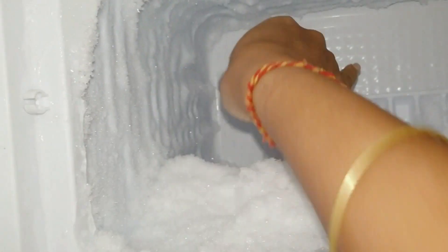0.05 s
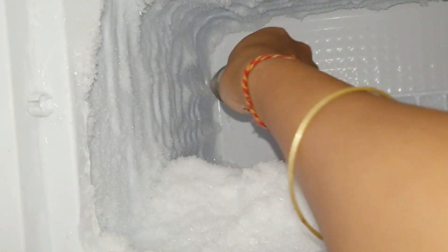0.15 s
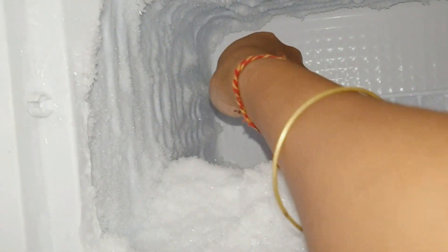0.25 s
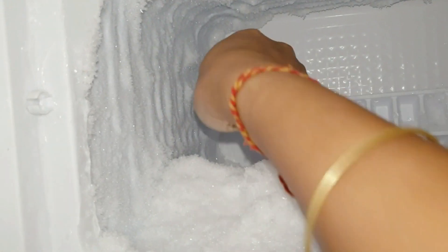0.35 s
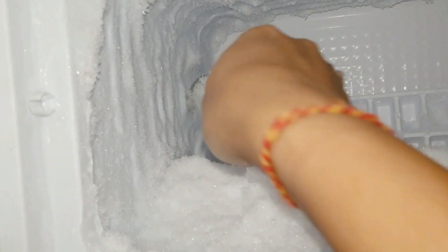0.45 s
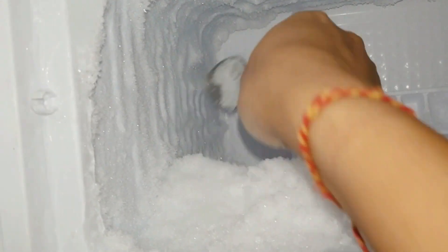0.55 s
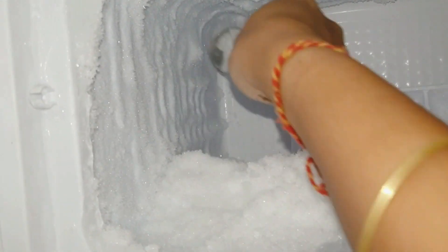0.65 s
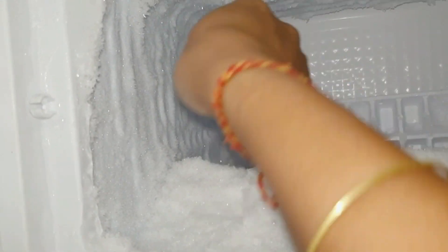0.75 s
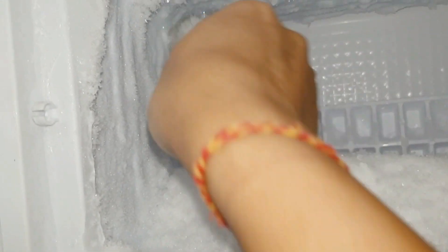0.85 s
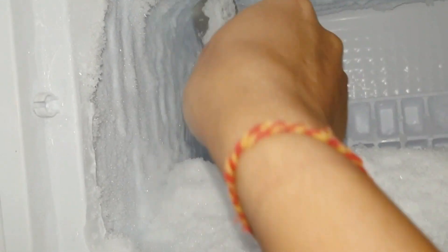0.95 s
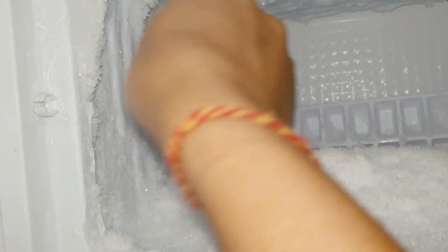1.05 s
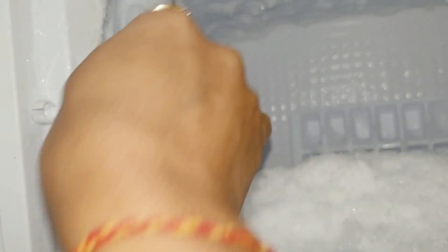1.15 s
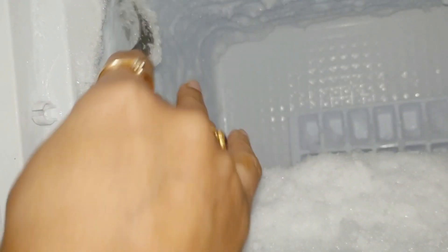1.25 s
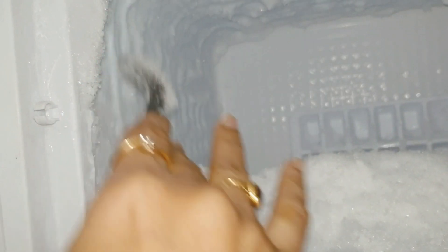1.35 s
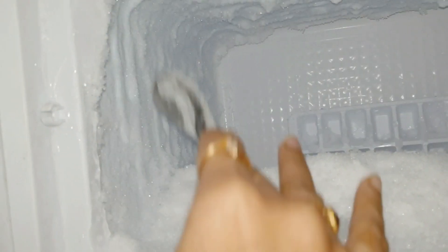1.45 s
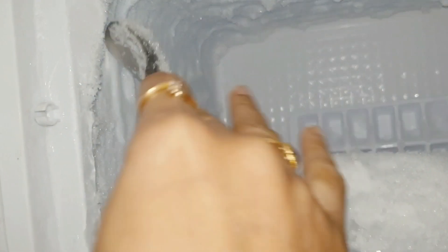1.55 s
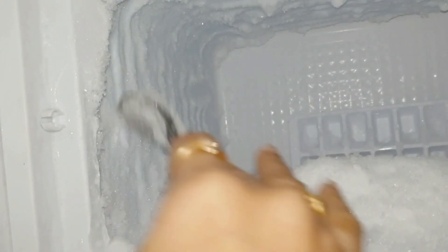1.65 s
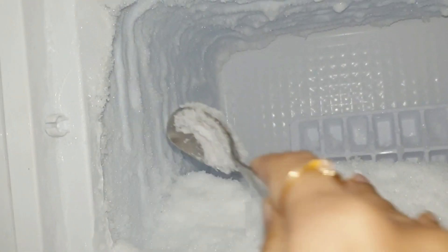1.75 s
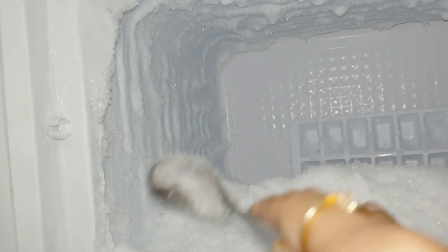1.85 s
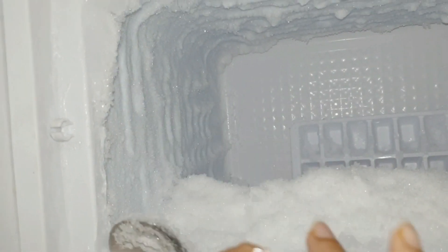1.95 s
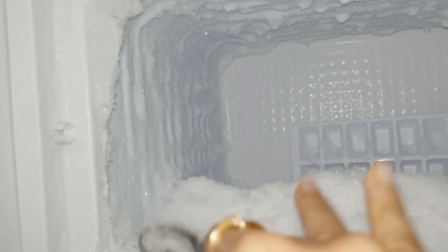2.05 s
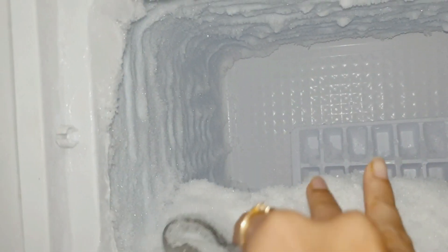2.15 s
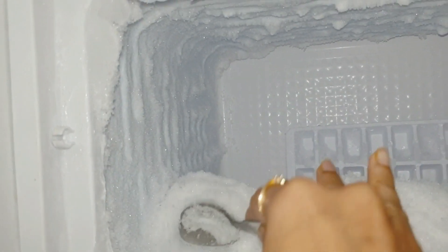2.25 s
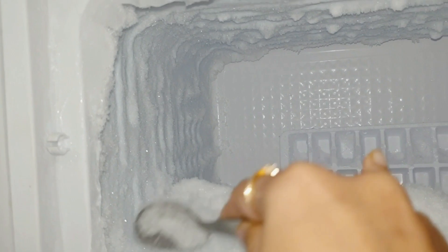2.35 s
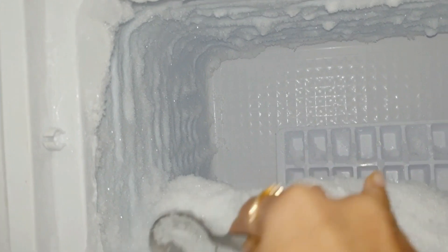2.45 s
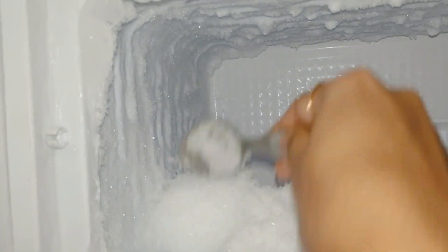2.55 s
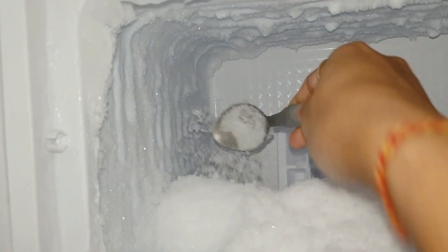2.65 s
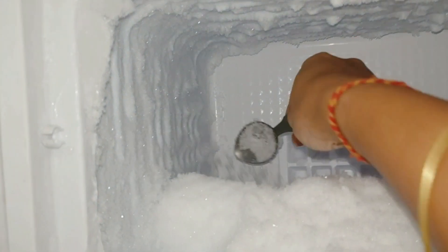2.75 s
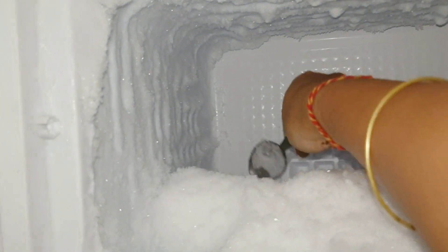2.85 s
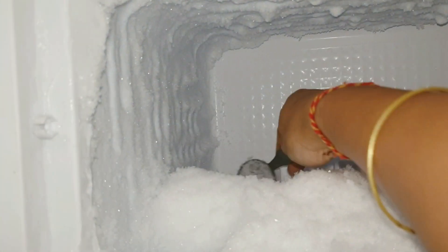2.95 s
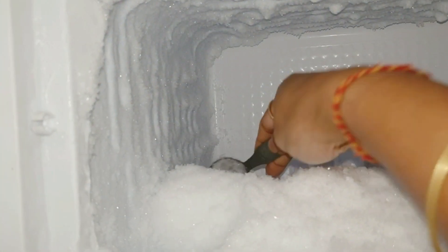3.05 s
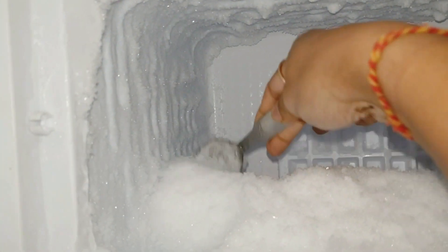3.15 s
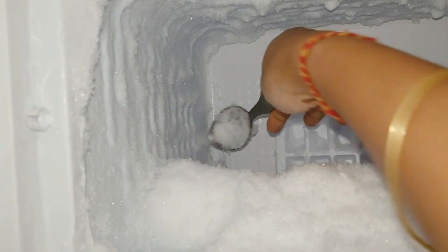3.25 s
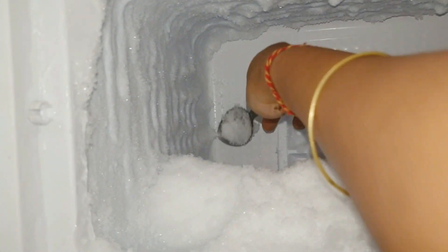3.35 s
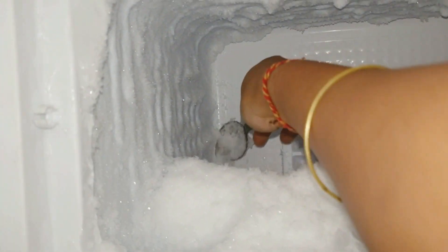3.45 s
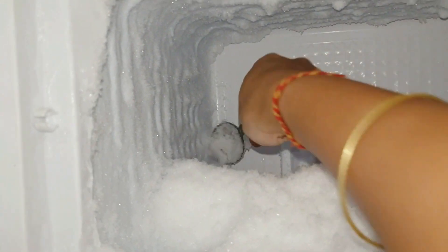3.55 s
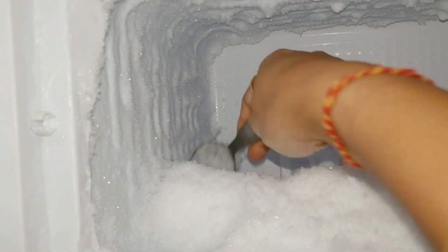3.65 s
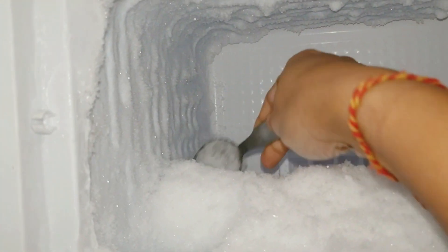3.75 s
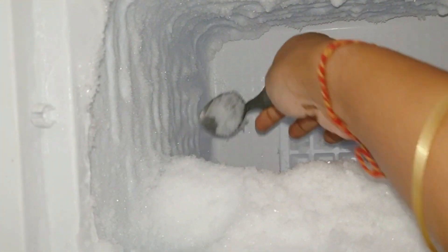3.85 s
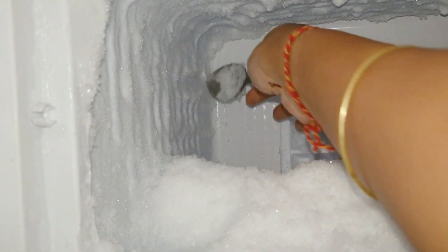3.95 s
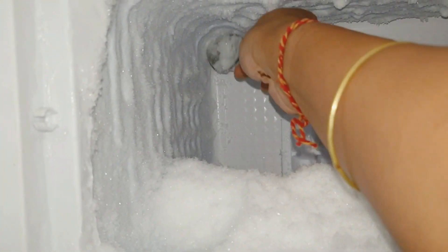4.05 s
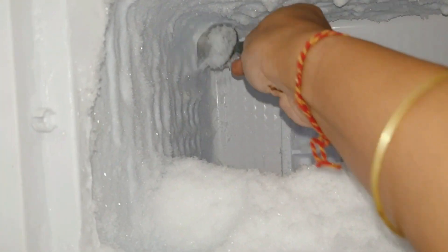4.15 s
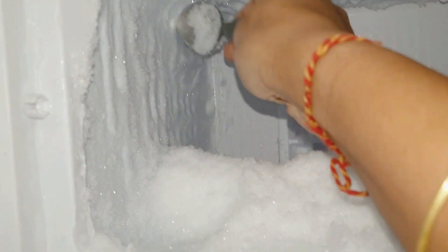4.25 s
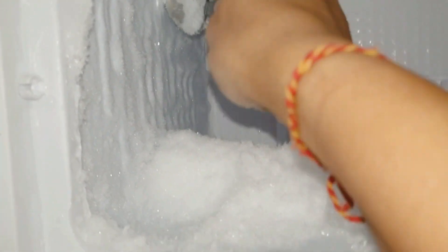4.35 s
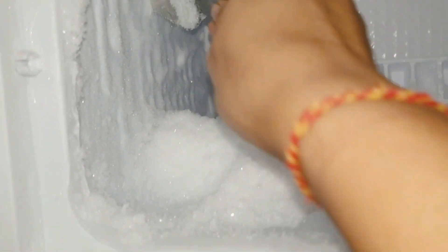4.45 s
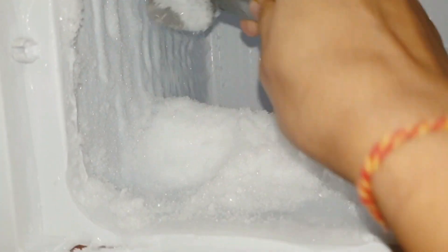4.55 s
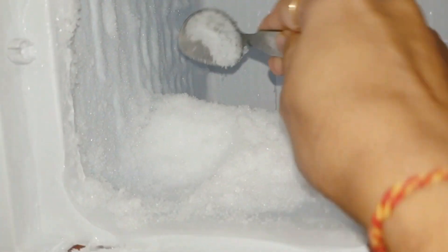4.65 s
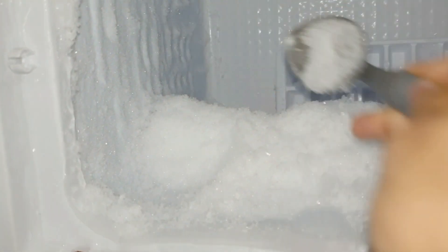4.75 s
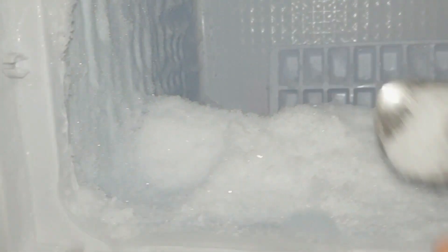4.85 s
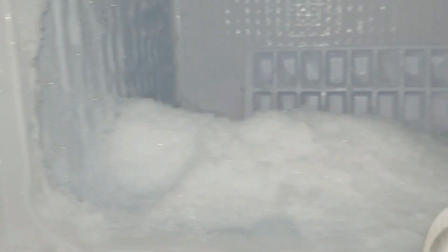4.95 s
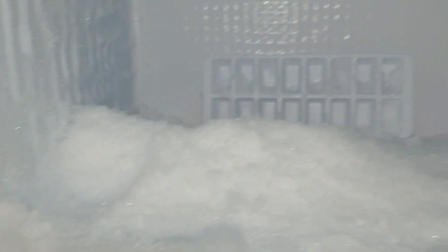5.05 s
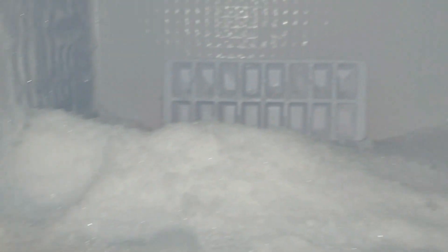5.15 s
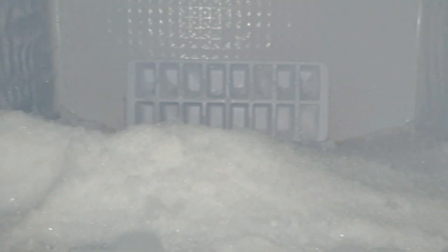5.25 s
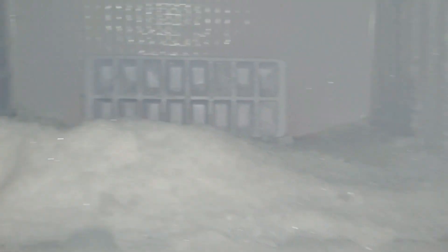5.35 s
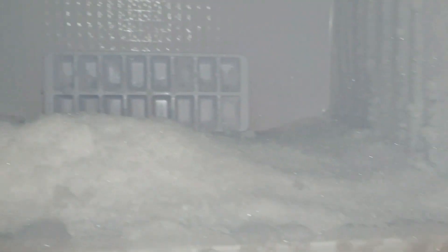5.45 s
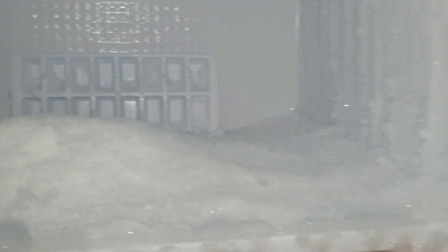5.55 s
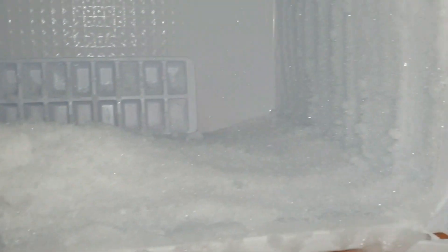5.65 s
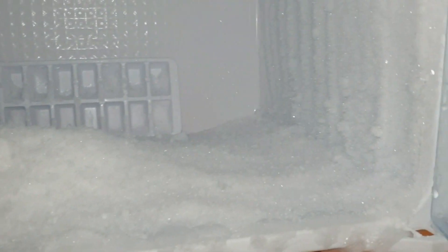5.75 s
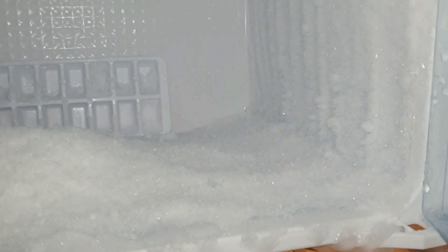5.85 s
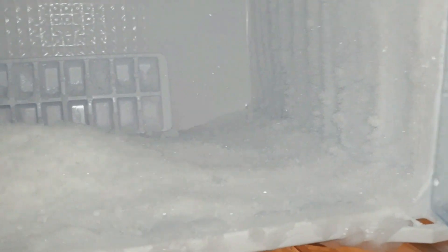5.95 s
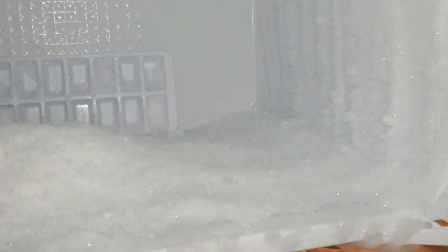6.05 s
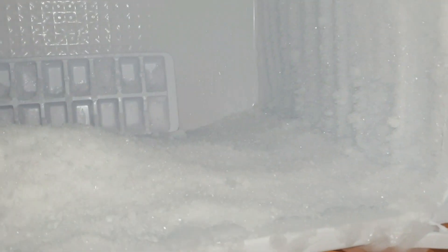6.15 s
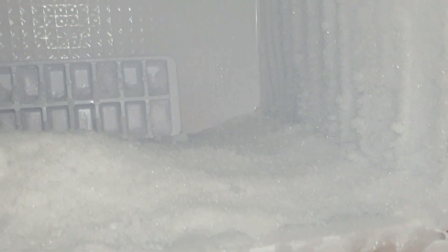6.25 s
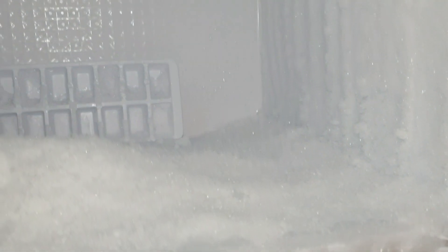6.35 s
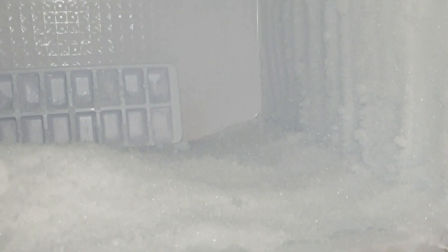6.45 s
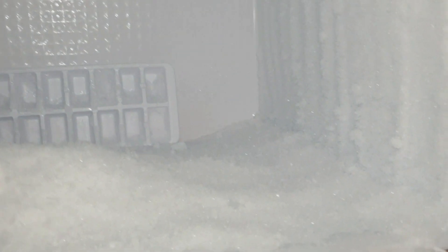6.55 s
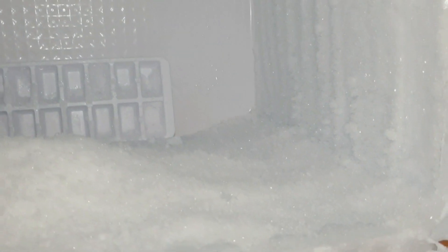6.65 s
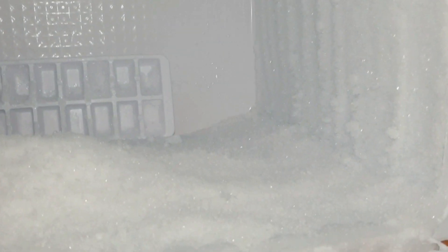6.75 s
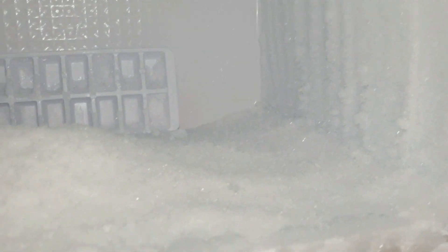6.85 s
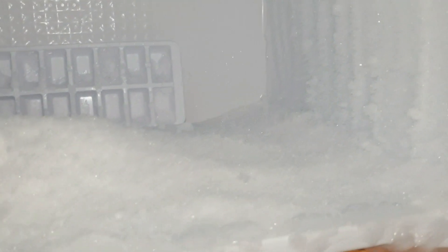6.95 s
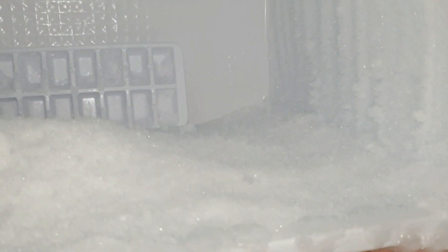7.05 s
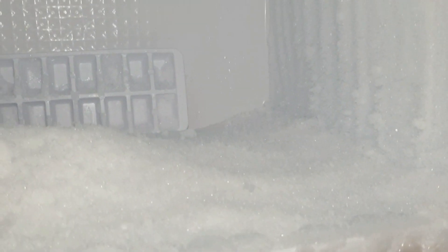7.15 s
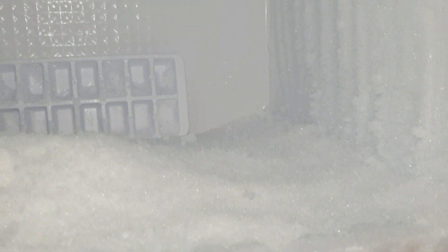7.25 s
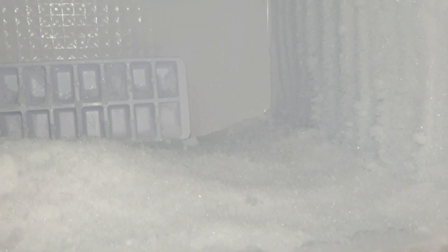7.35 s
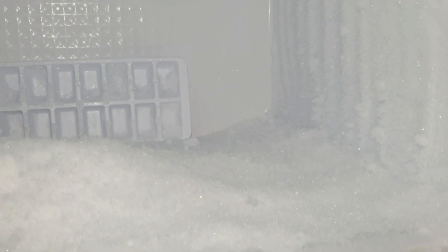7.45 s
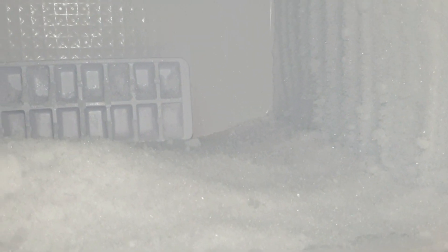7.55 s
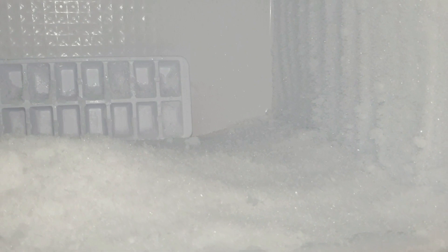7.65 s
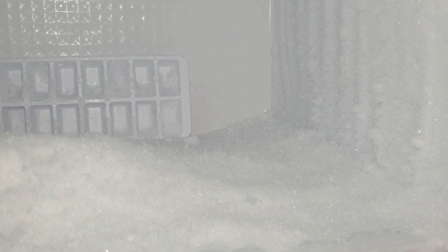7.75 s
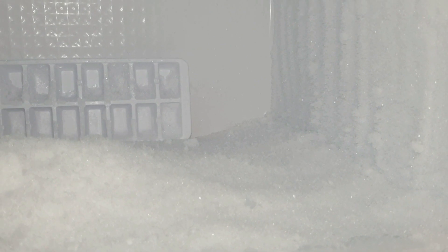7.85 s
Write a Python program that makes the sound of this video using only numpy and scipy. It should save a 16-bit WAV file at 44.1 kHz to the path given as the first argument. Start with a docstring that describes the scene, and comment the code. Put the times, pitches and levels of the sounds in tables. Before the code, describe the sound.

A steel spoon scrapes frost from the walls of a small freezer in about ten quick, crunchy strokes, mixed with knocks on hard ice that make the walls boom slightly. Midway, two loud, dull bumps hit the right side of the close microphone. The scraping stops, and after a lull come a short crackling judder, a few ice ticks and light rubs. A low hum, rumble and hiss lie underneath.

```python
"""A steel spoon scrapes frost off the walls of a small freezer box in ten quick strokes, with knocks and ticks.
Breaking crystals form a dense train of impulses, filtered by resonance: the air in the box colours each
stroke, the wall booms and the spoon's bowl sings near 12 kHz. Something bumps the right microphone twice.
After a lull come a judder, a few ticks and brief rubs. A low hum, rumble and hiss lie underneath."""
import sys
import numpy as np
from scipy import signal
from scipy.fft import rfft, irfft
from scipy.io import wavfile

SR = 44100
rng = np.random.default_rng(int(sys.argv[2]) if len(sys.argv) > 2 else 0)


def log_audio(samples):
    """Write samples as a 16-bit WAV file to the path given in sys.argv[1]."""
    # one column per channel
    frames = np.atleast_2d(samples).T
    # limit to full scale, then quantise
    limited = np.clip(frames, -1, 1)
    pcm = np.round(limited * 32767).astype(np.int16)
    wavfile.write(sys.argv[1], SR, pcm)


N = 348831


def from_db(db):
    """The decibel scale: 20 dB is a tenfold amplitude."""
    return 10 ** (np.asarray(db) / 20)


def unit_rms(x):
    """Normalisation to a mean power of 1."""
    return x / np.sqrt(np.mean(x ** 2) + 1e-20)


def butter(x, hz, kind, order=2):
    """Causal Butterworth filter, maximally flat in its passband."""
    sections = signal.butter(order, np.clip(hz, 10, .45 * SR), kind, fs=SR, output="sos")
    return signal.sosfilt(sections, x + 1e-18)


def drift(rate_hz, size):
    """Random modulation: Gaussian values, rate_hz a second, joined by straight lines."""
    knots = rng.standard_normal(4000)
    return np.interp(np.arange(size) / SR * rate_hz, np.arange(len(knots)), knots)


def colour(x, spectrum, modes=(), size=4096):
    """Minimum-phase filter: resonances (centre_hz, width_hz, boost_db) on a curve (freq_hz, gain_db)."""
    hz = np.maximum(np.arange(size // 2 + 1) * SR / size, 1)
    curve_hz, curve_db = np.transpose(spectrum)
    db = np.interp(np.log(hz), np.log(curve_hz), curve_db)
    for centre_hz, width_hz, boost_db in modes:
        db = db + boost_db / (1 + (2 * (hz - centre_hz) / width_hz) ** 2)
    cepstrum = irfft(np.log(from_db(db)))
    cepstrum[1:size // 2] *= 2  # folding the cepstrum makes the response causal
    cepstrum[size // 2 + 1:] = 0
    response = irfft(np.exp(rfft(cepstrum)))
    return signal.fftconvolve(x, response[None], axes=-1)[:, :x.shape[-1]]


def stereo(pair, coherence, pan_db):
    """Partial coherence: two signals cross-mix into left and right, whose mean has rms 1."""
    angle = np.arcsin(np.clip(coherence, -1, 1)) / 2
    mixed = np.cos(angle) * pair + np.sin(angle) * pair[::-1]
    panned = mixed * from_db([[pan_db / 2], [-pan_db / 2]])
    return panned / np.sqrt(np.mean(panned.mean(0) ** 2) + 1e-20)


def add(out, start_s, sound):
    """Superposition: a sound sums into the mix from start_s."""
    at = max(round(start_s * SR), 0)
    out[:, at:at + sound.shape[1]] += sound[:, :N - at]


# Swells of the hum: start_s, length_s, level_db
HUM_SWELLS = [(2.68, 0.59, -33.5), (6.25, 0.91, -41), (7.118, 0.87, -46)]

def hum(pitch_hz=53.4, waver_hz=0.84, steady_db=-57):
    """Frequency and amplitude modulation: a low tone wavers and now and then swells."""
    t = np.arange(N) / SR
    swells = sum(from_db(db) * np.sin(np.pi * np.clip((t - start_s) / length_s, 0, 1))
                 for start_s, length_s, db in HUM_SWELLS)
    tone = np.sin(2 * np.pi * np.cumsum(pitch_hz + waver_hz * drift(17, N)) / SR)
    return (from_db(steady_db) + swells) * stereo(np.array([tone, tone]), coherence=0.97, pan_db=-4.5)


# Spectrum of the rumble: freq_hz, relative_db
RUMBLE_SPECTRUM = [(15, -35.5), (25, -6.5), (43, -6.5), (59, 2.5), (79, -10), (119, 0), (178, -14.5),
                   (234, -11), (406, -15), (564, -24.5), (619, -17.5), (678, -28), (800, -26.5),
                   (1090, -43.5), (2000, -56.5), (2600, -73), (4400, -120)]

def rumble():
    """Coloured noise, strongest in the bass and nearly coherent between left and right."""
    noise = colour(rng.standard_normal((2, N)), RUMBLE_SPECTRUM, modes=[(53, 19, -8.5), (107, 52, 5)])
    return stereo(noise, coherence=0.93, pan_db=-4.5)


# Spectrum of the hiss: freq_hz, relative_db
HISS_SPECTRUM = [(800, 9), (2200, 1), (3300, -3.5), (5200, -4), (7800, -11.5), (11000, -1.5), (13500, -3.5),
                 (16000, -11.5)]

def hiss():
    """High-passed noise, which sounds wide because its coherence is low."""
    noise = colour(rng.standard_normal((2, N)), HISS_SPECTRUM)
    return stereo(butter(noise, 630, "high"), coherence=.3, pan_db=-2)


# Course of the background noise: time_s, rumble_db, hiss_db
BACKGROUND_LEVELS = [(0, -52.5, -64), (2.801, -39, -60.5), (3.9, -48.5, -65.5), (4.7, -47.5, -58.5),
                     (5.15, -56, -74), (6.052, -49.5, -69.5), (6.8, -40, -61.5), (7.1, -39, -56.5),
                     (7.91, -40, -63.5)]

def background():
    """The noise floor: rumble and hiss slowly rise and fall around the hum."""
    times_s, *levels_db = np.transpose(BACKGROUND_LEVELS)
    rumble_gain, hiss_gain = [from_db(np.interp(np.arange(N) / SR, times_s, db)) for db in levels_db]
    return hum() + rumble_gain * rumble() + hiss_gain * hiss()


def wall_echoes(x, count=3, strength=.6, delay_range_s=(.0004, .003), sweep_s=.00016, sweep_hz=9):
    """Comb filtering: hand and wall reflect short waves, and the delays slide as the spoon travels."""
    n = np.arange(len(x))
    treble = butter(x, 840, "high", order=1)
    left_lag_s = 0.000413 + sweep_s / 2 * drift(sweep_hz, len(n))  # the left microphone is farther away
    out = np.array([np.interp(n - left_lag_s * SR, n, x), x])
    for side in range(2):
        for delay_s in rng.uniform(*delay_range_s, count):
            lag_s = delay_s + sweep_s * drift(sweep_hz, len(n))
            out[side] += strength * np.interp(n - lag_s * SR, n, treble, left=0)
    return out


# Spectrum of breaking frost: freq_hz, relative_db
FROST_SPECTRUM = [(60, -7.5), (110, 6), (170, 0.5), (260, 2), (520, 1), (900, 5), (1300, -4), (1900, -8.5),
                  (3000, -13), (5000, -17.5), (8000, -20.5), (10300, -13.5), (13500, -13.5), (15000, -21)]
# Modes of the wall and of the spoon's bowl: centre_hz, width_hz, boost_db
WALL_AND_BOWL_MODES = [(113.4, 7.2, 8.5), (11370, 850, 9), (11040, 210, 3), (13100, 1500, 5),
                       (13070, 98, -2.5)]
# The four bands, boom, crunch, rasp and sizzle: low_hz, high_hz
FROST_BANDS = [(58, 410), (470, 1430), (1550, 7300), (7700, 17000)]
# Character of each band: coherence, pan_db, stroke_trim_db, knock_trim_db, knock_t60_ratio
BAND_VOICING = [(0, -4, -2, -1, 2.4), (0.55, -4, -0.5, 1, 1.2), (0.03, -5.5, -1, -3, .8),
                (0, -7, -3, -6, .8)]

def frost(size, resonances, breaks_per_s=6000, spread_db=2.5, lead_in=2048):
    """Source and filter: random fracture impulses excite wall, box and spoon, heard in four bands."""
    size = size + lead_in  # extra samples let the filters settle
    breaks = rng.random(size) < breaks_per_s / SR
    heights = from_db(spread_db * np.minimum(rng.exponential(1, size), 5)) * rng.choice([-1, 1], size)
    modes = [(hz, 16 + 0.062 * hz, db) for hz, db in resonances]  # higher modes are wider
    swarm = colour(wall_echoes(breaks * heights), FROST_SPECTRUM, WALL_AND_BOWL_MODES + modes)
    return [stereo(butter(swarm, edges_hz, "band", order=4)[:, lead_in:], coherence, pan_db)
            for edges_hz, (coherence, pan_db, *_) in zip(FROST_BANDS, BAND_VOICING)]


# Modes of the spoon's stem: centre_hz, boost_db
STEM_MODES = [(1210, 6), (1850, 5.5), (2450, 1.5), (3200, 8), (3900, 4.5)]
# Blows on hard ice, before band voicing: start_s, boom_db, crunch_db, rasp_db, sizzle_db, base_t60_s
KNOCKS = [(0.1913, -28.5, -33, -25.5, -32.5, 0.13), (0.434, -21, -20, -51, -38, 0.092),
          (0.727, -34, -42.5, -36.5, -39, 0.14), (1.067, -28.5, -36.5, -35, -52, 0.09),
          (1.412, -32, -27.5, -35.5, -55, .1), (1.613, -26.5, -25, -29.5, -25.5, 0.1),
          (1.988, -21, -50, -35, -26, 0.19), (2.006, -25, -25, -14.5, -35, 0.058),
          (2.047, -27.5, -50, -29, -29.5, 0.082), (2.077, -24, -30.5, -14, -12, 0.034),
          (2.221, -22, -50, -26, -14.5, 0.031), (2.441, -15.5, -39, -27, -27, 0.048),
          (2.946, -33.5, -48.5, -20, -32, 0.079), (3.434, -25, -36, -34, -47.5, 0.1),
          (4.058, -52, -33.5, -26.5, -35, 0.1), (4.225, -25, -23.5, -35, -39.5, 0.092),
          (4.426, -19.5, -14.5, -15.5, -38, 0.068)]

def knocks(rise_s=.001):
    """Impact and free decay: a blow crushes frost, the stem clinks and the wall rings longest."""
    out, t = np.zeros((2, N)), np.arange(SR // 4) / SR
    rise = 1 - np.exp(-t / rise_s)
    for start_s, *levels_db, base_t60_s in KNOCKS:
        bands = frost(len(t), STEM_MODES)
        for band, db, (*_, trim_db, t60_ratio) in zip(bands, levels_db, BAND_VOICING):
            fade = from_db(-60 * t / (base_t60_s * t60_ratio))
            add(out, start_s, band * from_db(db + trim_db) * fade * rise)
    return out


# Resonances that a light rub brings out: centre_hz, boost_db
RUB_MODES = [(380, 9.5), (1800, 3.5), (2200, 3)]
# Light passing rubs: start_s, length_s, boom_db, crunch_db, rasp_db, sizzle_db
RUBS = [(0.23, 0.041, -47, -45, -34.5, -37.5), (1.02, 0.059, -47, -46.5, -48, -54),
        (1.461, 0.17, -57.5, -60.5, -66, -58.5), (1.79, 0.22, -60, -57.5, -60.5, -52),
        (2.886, 0.06, -57, -51, -43, -51.5), (3.875, 0.027, -48, -38, -41, -44.5),
        (7.207, 0.058, -37, -49, -47.5, -49), (7.334, 0.11, -49, -50, -47, -51.5),
        (7.376, 0.038, -55, -44.5, -33, -35.5)]

def rubs():
    """Sliding friction: the noise of the frost swells and fades with each light contact."""
    out = np.zeros((2, N))
    for start_s, length_s, *levels_db in RUBS:
        contact = signal.windows.tukey(round(length_s * SR), .5)
        rub = sum(band * from_db(db) for band, db in zip(frost(SR // 2, RUB_MODES), levels_db))
        add(out, start_s, contact * rub[:, :len(contact)])
    return out


# How each band follows a pull: first_touch_db, brightening_share, ring_s, delay_s
BAND_RESPONSE = [(-6.5, 0.073, .14, 0.018), (-11, -.45, 0.07, .002), (-10.5, -0.22, 0.0089, 0.006),
                 (-12, .8, 0.012, .001)]

def pull_envelopes_db(t, attack_s, length_s, release_s, brightening_db, arch_db=1.5, fall_db=-36):
    """Attack, sustain and release, band by band: the spoon digs in, holds and lets go."""
    for touch_db, share, ring_s, delay_s in BAND_RESPONSE:
        age_s = t - delay_s
        progress = np.clip(age_s / length_s, 0, 1)
        dig = touch_db * np.clip(1 - age_s / attack_s, 0, 1)
        hold = arch_db * (np.sin(np.pi * progress) - .5) + share * brightening_db * (progress - .5)
        let_go = fall_db * np.maximum(age_s - length_s, 0) / (release_s + ring_s)
        yield dig + hold + let_go


# Air resonances of the freezer box: centre_hz, boost_db
BOX_MODES = [(112, 4), (200, 4.5), (305, 5), (385, 6), (560, 5), (748, 9), (927, 5), (1670, 0), (2040, 1.5),
             (2255, -2.5), (2710, 0), (3770, -1), (4190, 1)]
# Pulls of the spoon, before band voicing and response: start_s, attack_s, length_s, release_s,
# boom_db, crunch_db, rasp_db, sizzle_db, brightening_db, lower_mode_hz, upper_mode_hz
STROKES = [ (0.269, 0.067, 0.23, 0.077, -32, -31, -30, -31.5, 8.5, 312, 1030),
           (0.741, 0.045, .16, 0.041, -39.5, -36.5, -34, -33, 13.5, 1110, 3930),
           (1.075, 0.038, 0.36, 0.046, -33.5, -42, -35, -29, -6, 188, 784),
           (1.637, 0.044, 0.085, 0.027, -30, -32, -27.5, -29.5, -13, 382, 1600),
           (2.113, 0.016, 0.13, 0.092, -23, -43, -36, -33.5, -6.5, 165, 482),
           (2.449, 0.011, 0.066, 0.046, -21, -38.5, -35.5, -29.5, 7.5, 206.5, 774),
           (2.962, .045, 0.13, .1, -23, -37, -27.5, -33, 18.5, 180, 1704),
           (3.512, 0.035, 0.17, 0.061, -27, -28, -26, -29, 1.5, 900, 3890),
           (3.977, 0.0057, 0.41, 0.09, -32.5, -40.5, -35.5, -38.5, 7.5, 371, 1930),
           (4.438, 0.0083, .13, 0.016, -32, -33, -33.5, -33, -2.5, 806, 1414), ]

def strokes(bite_s=.004, place_spread_db=0.5, favoured_db=10):
    """Cavity resonance: the box colours each scrape, and the spoon's place favours two modes."""
    out, t = np.zeros((2, N)), np.arange(SR * 4 // 5) / SR
    bite = np.minimum(t / bite_s, 1)
    for start_s, attack_s, length_s, release_s, *levels_db, brightening_db, lower_hz, upper_hz in STROKES:
        # The edge catches and meets lumps, shaking all bands together.
        catching_db = -0.45 * drift(190, len(t))
        lumps_db = 2.3 * drift(45, len(t))
        cavity = [(hz, db + place_spread_db * rng.standard_normal()) for hz, db in BOX_MODES]
        bands = frost(len(t), cavity + [(lower_hz, favoured_db), (upper_hz, favoured_db)])
        envelopes = pull_envelopes_db(t, attack_s, length_s, release_s, brightening_db)
        for band, db, pull_db, (_, _, trim_db, *_) in zip(bands, levels_db, envelopes, BAND_VOICING):
            add(out, start_s, band * bite * from_db(db + trim_db + pull_db + catching_db + lumps_db))
    return out


# Small ticks of ice: start_s, relative_db, centre_hz
TICKS = [(1.018, -35.5, 9500), (1.065, -38, 6960), (2.518, -29, 11500), (2.978, -14, 2350),
         (3.235, -36.5, 10400), (5.319, -50.5, 3750), (5.336, -45, 3550), (5.826, -36, 4960),
         (6.122, -35.5, 10200), (6.29, -44, 11050), (7.045, -26.5, 8500), (7.059, -26.5, 10800),
         (7.126, -42, 8630), (7.172, -34.5, 9600), (7.35, -27.5, 2080), (7.402, -29.5, 4970)]

def ticks(t60_s=0.012, gain_db=-5, edge_ratio=1.38, crumbs_db=-22, crumbs_t60_s=.13):
    """Brittle fracture: a flake snaps in a burst of noise, and its crumbs leave a slower decay."""
    out, t = np.zeros((2, N)), np.arange(SR // 8) / SR
    fade = from_db(-60 * t / t60_s) + from_db(crumbs_db - 60 * t / crumbs_t60_s)
    for start_s, db, hz in TICKS:
        snap = butter(rng.standard_normal((2, len(t))), [hz / edge_ratio, hz * edge_ratio], "band", order=3)
        add(out, start_s, stereo(snap, coherence=0.12, pan_db=-4) * from_db(db + gain_db) * fade)
    return out


# Touches on the right microphone: start_s, level_db, scuff_t60_s, grit_relative_db
BUMPS = [(3.3837, 10, 0.06, -19.5), (3.4924, 17.5, 0.051, -18)]

def microphone_bumps(swing_hz=58, swing_t60_s=0.081, swing_db=-1, rise_s=0.0038):
    """Handling noise: a touch on the port makes a dull, gritty scuff and a damped swing of pressure."""
    out, t = np.zeros((2, N)), np.arange(SR // 4) / SR
    rise = 1 - np.exp(-t / rise_s)
    swing = np.sin(2 * np.pi * swing_hz * t) * from_db(swing_db - 60 * t / swing_t60_s)
    for start_s, db, t60_s, grit_db in BUMPS:
        scuff = unit_rms(butter(rng.standard_normal(len(t)), [70, 210], "band"))
        grit = from_db(grit_db) * unit_rms(butter(rng.standard_normal(len(t)), 2500, "low"))
        touch = ((scuff + grit) * from_db(-60 * t / t60_s) + swing) * rise
        add(out, start_s, from_db(db) * touch * [[0], [1]])  # right channel only
    return out


# Slips of one short judder: start_s, level_db
SLIPS = [(6.8926, -34), (6.898, -12.5), (6.9025, -15.5), (6.907, -13), (6.9105, -17)]

def judder(crack_t60_s=0.041, crack_db=-2, thud_hz=240, thud_t60_s=0.022, rise_s=0.00027):
    """Stick-slip motion: slips follow in quick succession, each a bright crack on a dull thud."""
    out, t = np.zeros((2, N)), np.arange(SR // 16) / SR
    crack_spectrum = [(200, -15), (520, 11.5), (1000, -17.5), (1600, -8.5),  # freq_hz, relative_db
                      (4500, -2.5), (8000, -12.0), (12000, 0.5), (16000, -12)]
    rise = 1 - np.exp(-t / rise_s)
    thud = np.sin(2 * np.pi * thud_hz * t) * from_db(-60 * t / thud_t60_s)
    for start_s, db in SLIPS:
        noise = colour(rng.standard_normal((2, len(t))), crack_spectrum)
        crack = stereo(noise, coherence=.2, pan_db=-6) * from_db(crack_db - 60 * t / crack_t60_s)
        add(out, start_s, from_db(db) * (crack + thud) * rise)
    return out


def room(x, t60_s=0.3, rise_s=0.0033, tail_db=-11.5, treble_hz=7000, bass_db=-14.5, bass_hz=450):
    """Diffuse reverberation: a faint exponential tail, fuller in the bass and dull at the top."""
    t = np.arange(SR) / SR
    tail = rng.standard_normal((2, SR)) * from_db(-60 * t / t60_s) * (1 - np.exp(-t / rise_s))
    tail = tail / np.sqrt(np.sum(tail ** 2) / 2)
    dull = from_db(tail_db) * butter(tail, treble_hz, "low", order=1)
    bass = from_db(bass_db) * butter(tail, bass_hz, "low")
    return signal.fftconvolve(x.mean(0)[None], dull + bass, axes=-1)[:, :N]


def scene():
    """Superposition of spoon and ice, their reverberation, the background and the microphone bumps."""
    freezer = strokes() + rubs() + knocks() + ticks() + judder()
    return freezer + room(freezer) + background() + microphone_bumps()


def record(dry):
    """Hard clipping and band limiting: the input overloads near full scale and is cut above 16 kHz."""
    low_pass = signal.ellip(10, .1, 80, 16000, fs=SR, output="sos")
    return signal.sosfilt(low_pass, np.clip(dry, -.95, .95))


dry = scene()
out = record(dry)
log_audio(out)
```